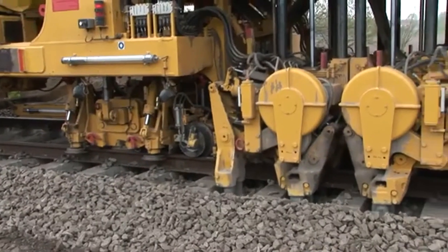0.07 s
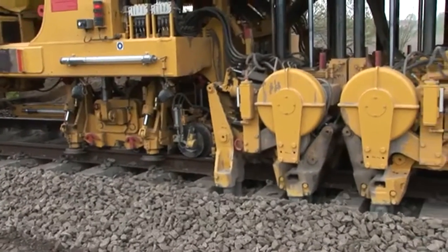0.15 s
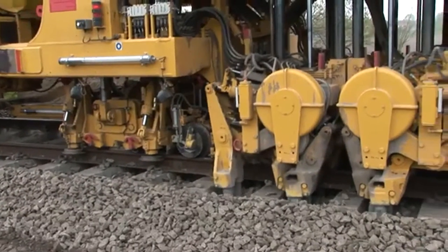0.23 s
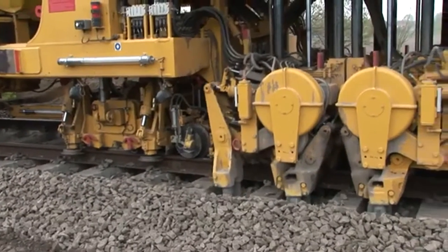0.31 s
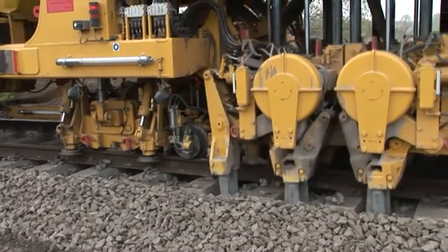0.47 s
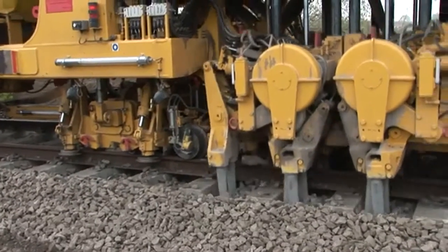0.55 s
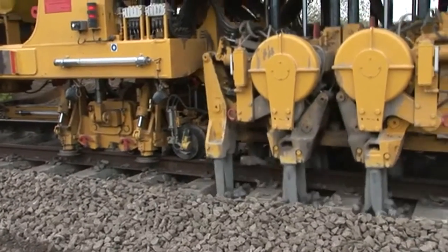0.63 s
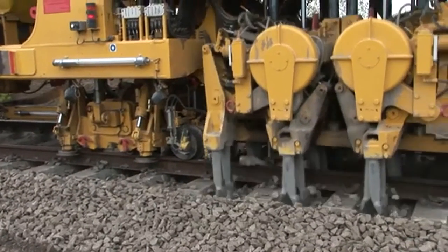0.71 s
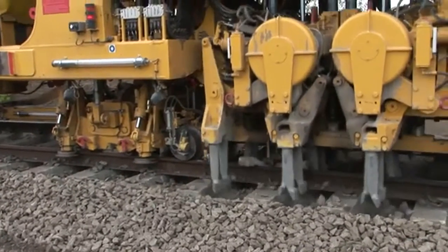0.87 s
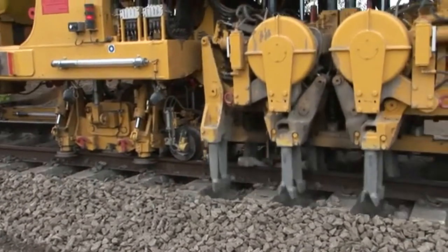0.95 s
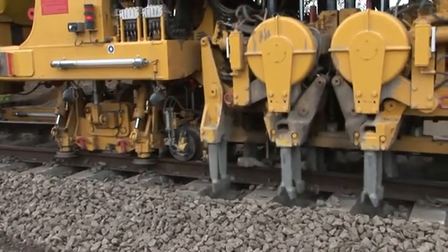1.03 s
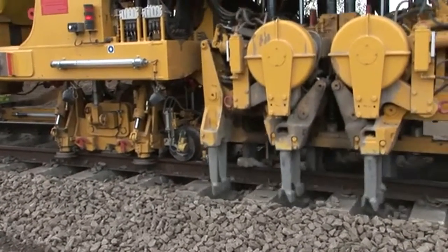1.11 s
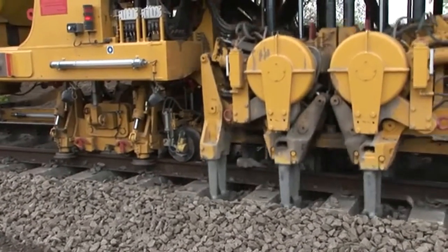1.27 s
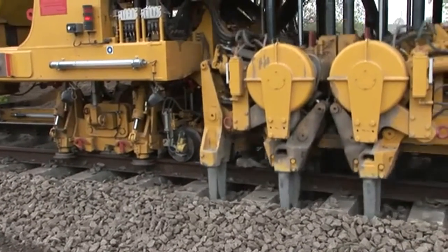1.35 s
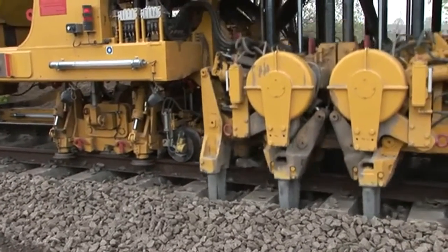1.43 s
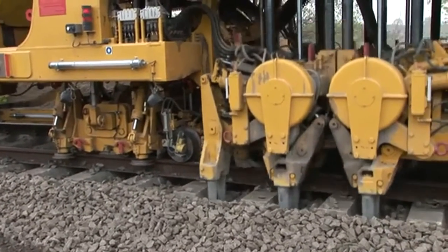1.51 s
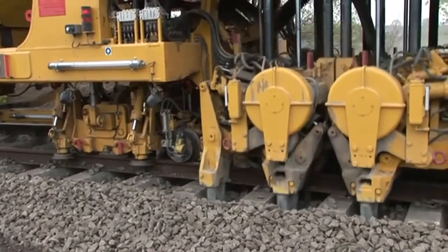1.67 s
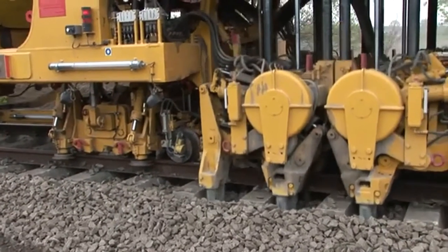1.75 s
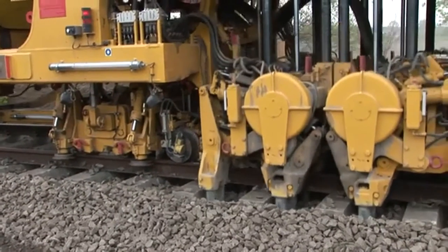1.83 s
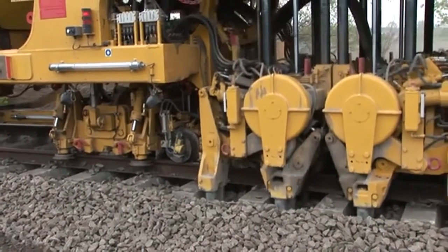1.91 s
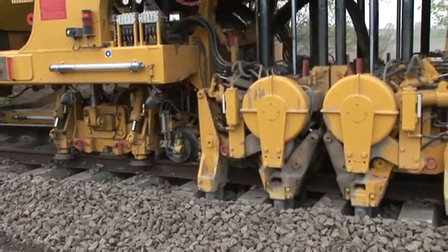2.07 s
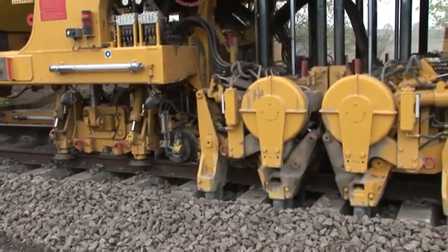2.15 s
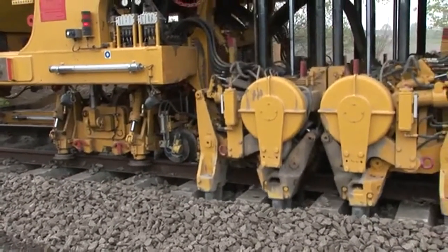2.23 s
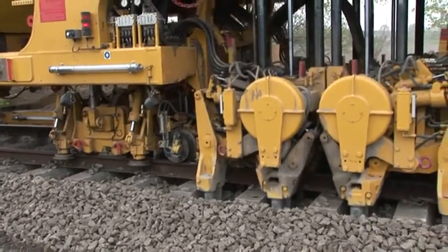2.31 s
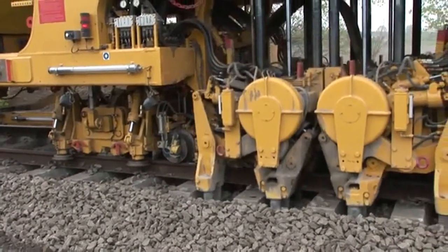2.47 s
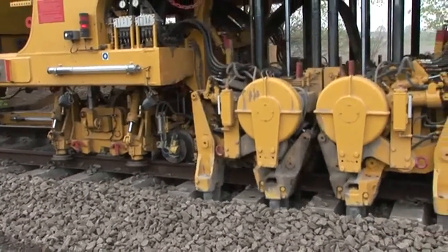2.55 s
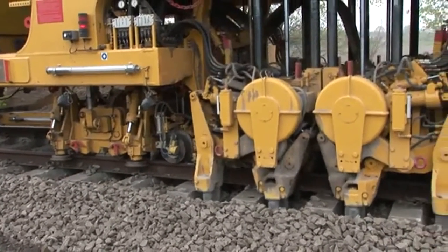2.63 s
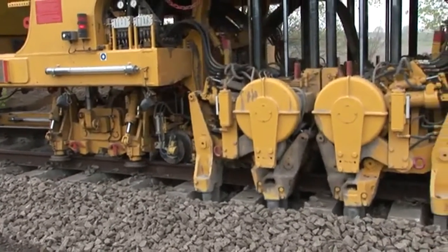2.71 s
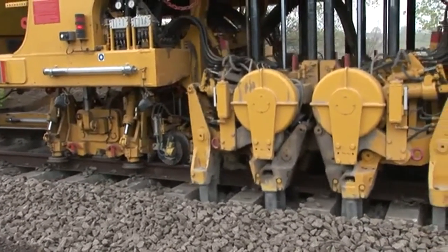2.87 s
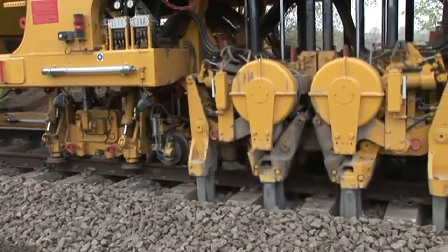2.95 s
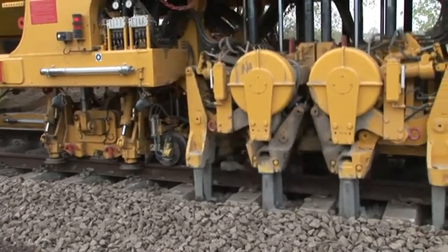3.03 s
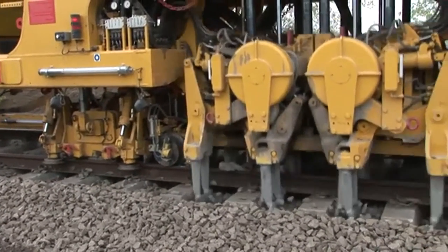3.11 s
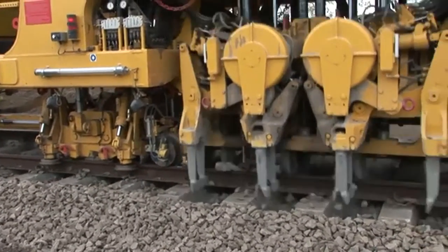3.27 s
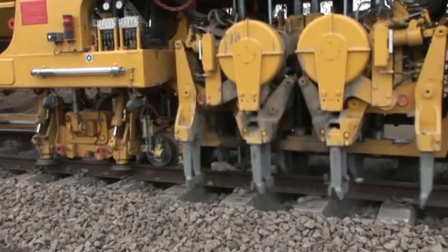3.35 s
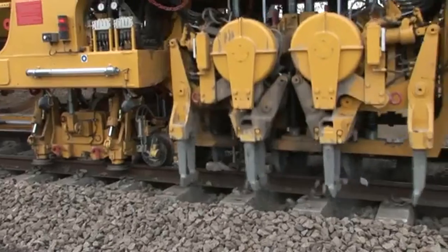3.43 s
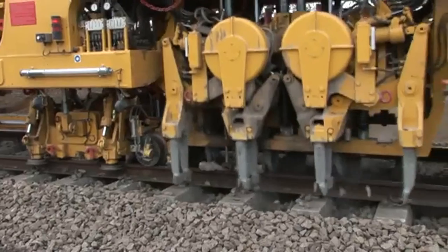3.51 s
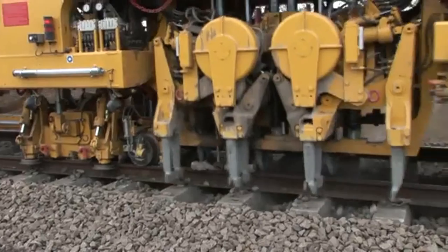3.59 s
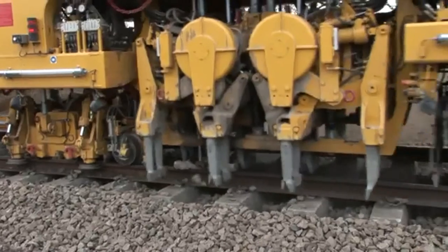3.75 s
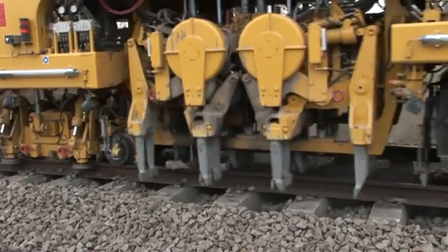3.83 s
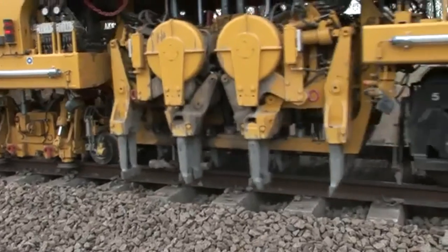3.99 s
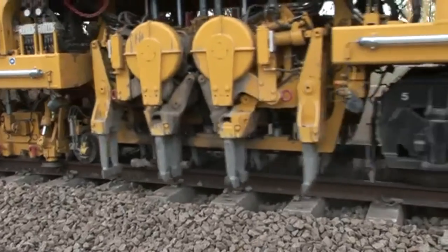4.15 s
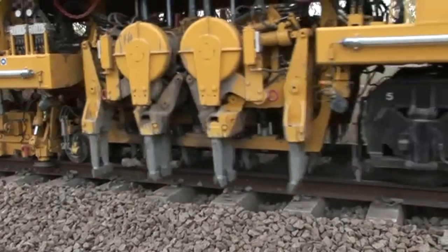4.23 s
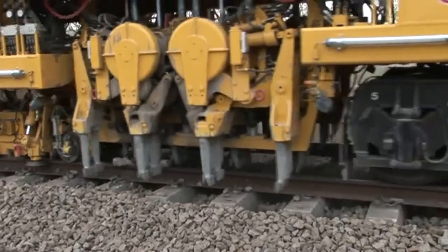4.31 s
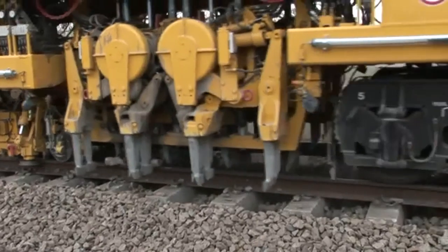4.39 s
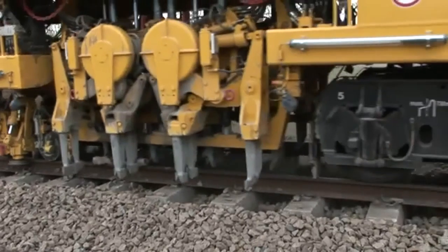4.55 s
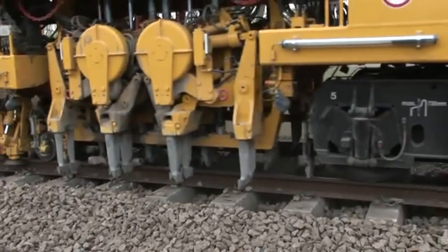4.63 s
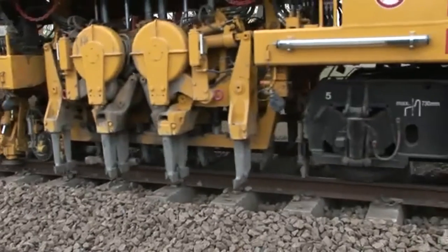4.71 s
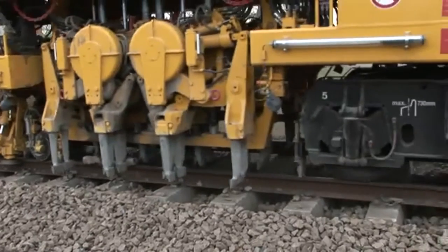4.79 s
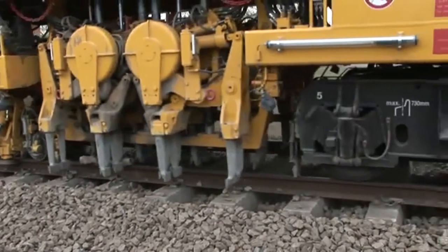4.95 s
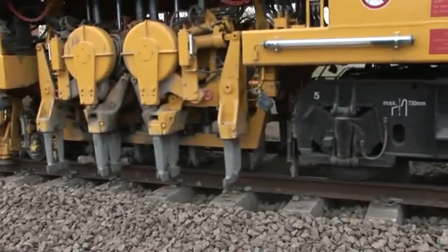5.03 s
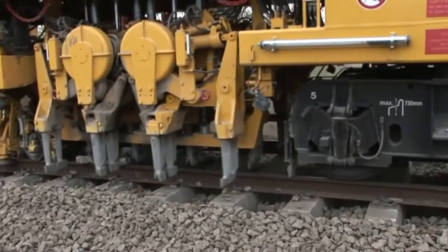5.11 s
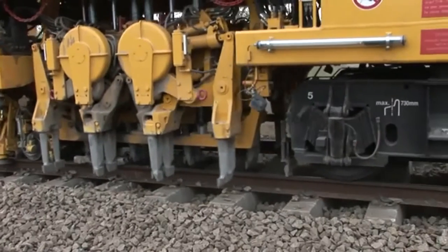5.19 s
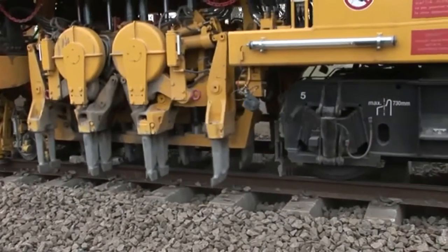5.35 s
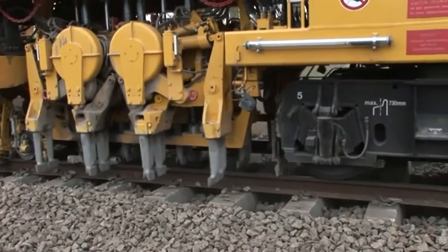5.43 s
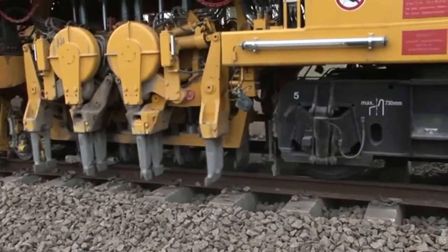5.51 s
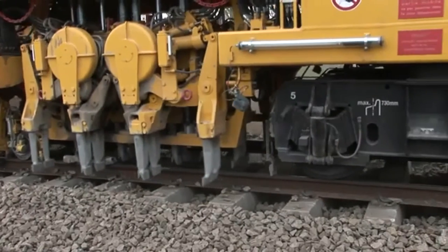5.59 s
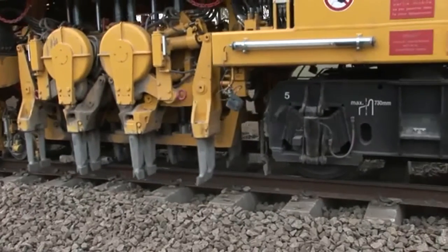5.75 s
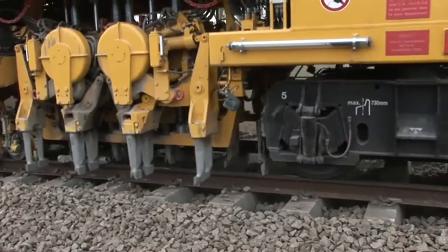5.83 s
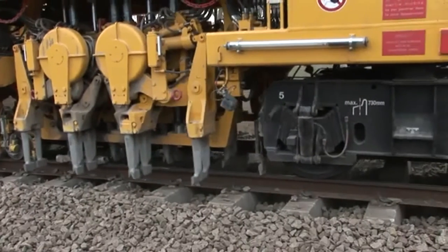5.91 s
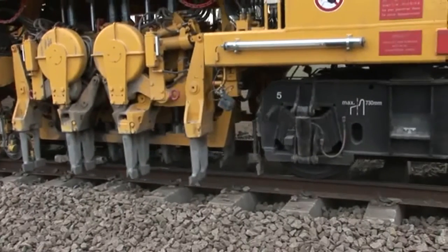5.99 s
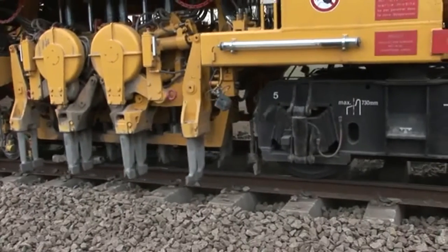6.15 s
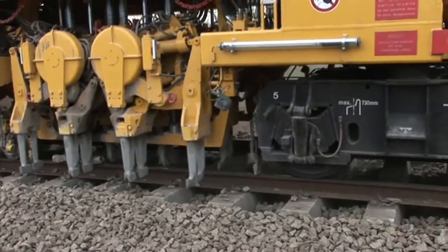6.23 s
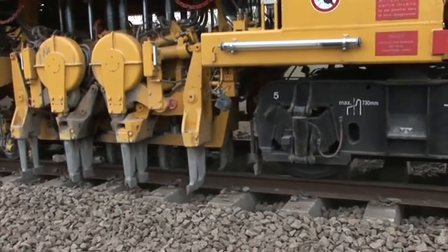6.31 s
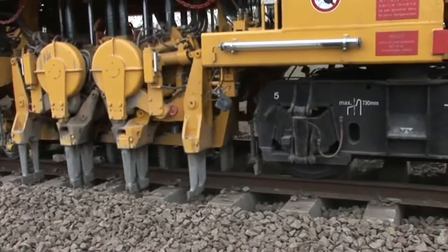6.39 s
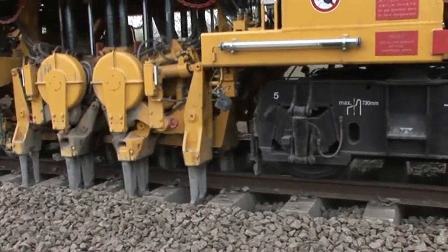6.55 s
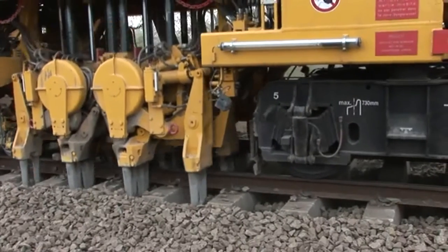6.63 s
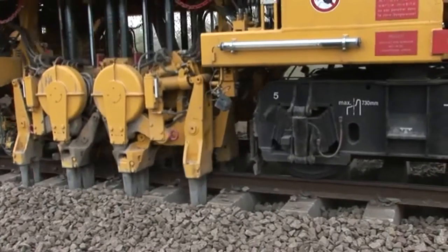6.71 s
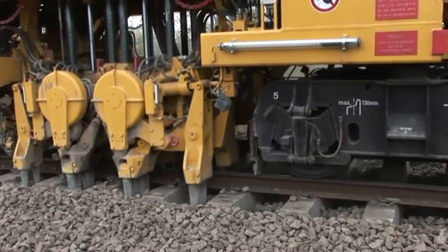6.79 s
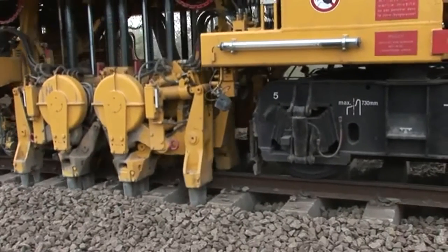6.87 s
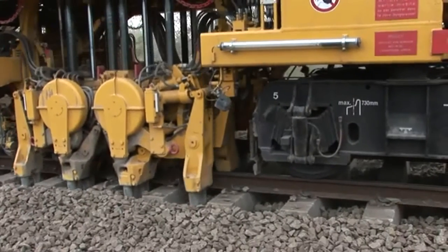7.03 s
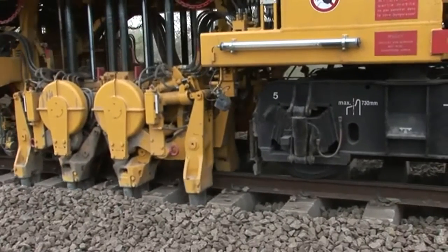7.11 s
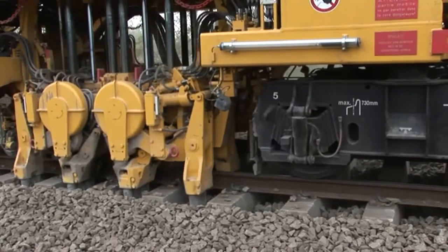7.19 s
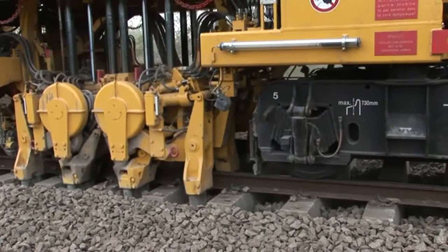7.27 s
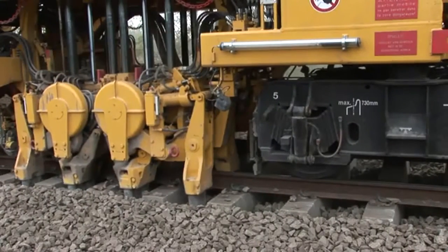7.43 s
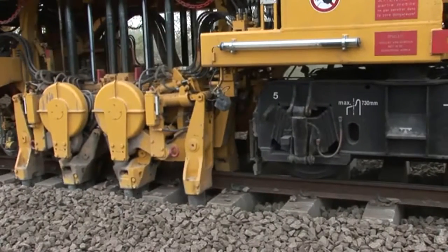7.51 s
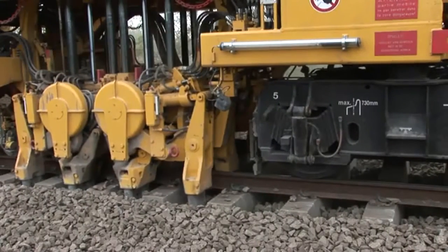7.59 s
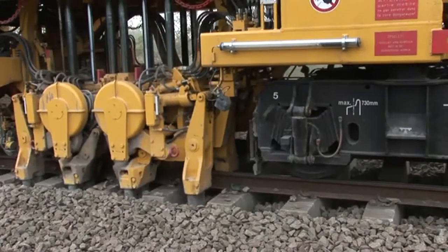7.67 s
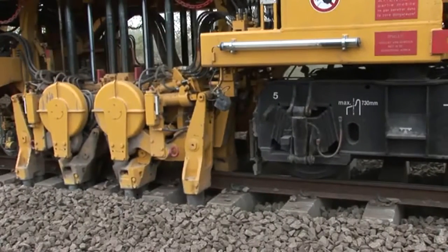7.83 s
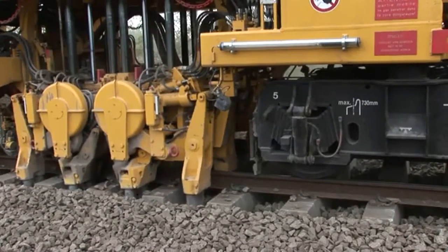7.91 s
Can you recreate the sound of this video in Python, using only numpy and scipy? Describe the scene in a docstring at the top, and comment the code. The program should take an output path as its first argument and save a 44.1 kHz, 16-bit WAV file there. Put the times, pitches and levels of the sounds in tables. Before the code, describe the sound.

A diesel engine, fan and hydraulic pump make a dense, steady roar beside the track. Over it, steel tines shaking dozens of times a second rattle harshly in ballast, with hard knocks and brief steel ringing. The stone noise stops and returns twice; between plunges comes a buzzing, pulsing mechanical drone with puffs of air. Close, dry, open-air stereo pickup.

```python
"""Track tamping machine in ballast

An eccentric shaft shakes steel tines about 36 times a second: loose joints buzz as a stack of shaft harmonics.
The tines start buried, lift, plunge again, lift, and plunge once more: stones click, crush and grind
as filtered bursts and noise in step with the shaft, with hard blows and singing steel on top.
Behind them are a diesel and fan on geared tones, a sliding pump hum, a throbbing roar, air hiss and low lurches.
"""
import sys
import numpy as np
from scipy import signal
from scipy.fft import rfft, irfft, next_fast_len
from scipy.io import wavfile
from scipy.ndimage import uniform_filter1d, map_coordinates

SR = 44100
rng = np.random.default_rng(int(sys.argv[2]) if len(sys.argv) > 2 else 0)


def store_wav(level_fs):
    """Save 16-bit WAV to argv[1]."""
    pcm = np.round(np.clip(np.atleast_2d(level_fs), -1, 1) * 32767)
    wavfile.write(sys.argv[1], SR, pcm.T.astype(np.int16))


N = 350595

# Speed of the eccentric shaft. Each row: time in seconds, turns per second.
SHAFT_SPEED = [(0, 35.9), (.4, 36.3), (1.1, 36.6), (1.6, 36), (2.15, 35), (2.6, 35.8), (3.35, 36.88),
               (3.75, 36.66), (4.15, 36.14), (4.65, 35.9), (5.15, 36.74), (5.5, 37.06), (5.92, 37.12),
               (6.35, 36.6), (6.9, 36.25), (7.3, 35.2), (7.95, 35.2)]
# Buzz of the free tines. Each row: multiple of the shaft rate, relative level in dB.
FREE_PARTIALS = [(3, -11), (4, -13), (5, -13), (6, -13), (7, -9), (8, -13), (9, -9), (10, -12), (11, -10),
                 (12, -12), (13, -9), (14, -15), (15, -10), (16, -12), (17, -16), (18, -19), (19, -15),
                 (20, -16), (21, -12.5), (22, -16), (23, -16), (24, -19), (25, -16), (26, -18), (27, -16),
                 (28, -13), (29, -17), (30, -15), (31, -17), (32, -17), (33, -13), (34, -19), (35, -15)]
# Thrum of the buried tines. Each row: multiple of the shaft rate, relative level in dB.
BURIED_PARTIALS = [(2, -7), (3, -5), (4, 0), (5, -11), (6, -6), (7, -6), (10, -4), (12, -1), (13, -3),
                   (14, -4), (16, -6), (22, -8)]
# Panels of the frame sing along with single partials.
# Each row: multiple of the shaft rate, start in seconds, end in seconds, boost in dB.
PANEL_SWELLS = [(6, 5.55, 6.15, 7), (7, 3.4, 3.85, 5), (7, 5.2, 5.52, 9.5), (7, 6.4, 6.65, 7.5),
                (8, 4.1, 4.5, 6), (9, .9, 1.35, 6), (9, 5, 6.25, 7.5), (10, 4.8, 5.4, 6),
                (10, 5.9, 6.65, 7.5), (11, 3.38, 4.05, 7.5), (11, 4.45, 5.05, 7), (11, 5.35, 6.35, 8),
                (12, 1, 1.3, 6), (12, 3.7, 4, 6), (12, 5.05, 5.5, 9), (14, 3.8, 4.3, 10),
                (15, 3.38, 3.68, 8), (15, 4.1, 4.75, 7.5), (15, 6.1, 6.7, 7), (16, 4.1, 4.45, 10),
                (17, 5.2, 6.1, 5.5), (19, 5.08, 6.28, 7), (19, 5.08, 5.42, 4.5), (19, 5.75, 6.25, 4),
                (23, 5.05, 6.5, 5), (27, 4.65, 6.7, 9.5), (27, 4.97, 5.42, 6), (30, 5.1, 5.3, 7),
                (35, 3.75, 4.25, 7), (35, 5.8, 6.08, 10)]
# Distance and balance. Each row: time in seconds, buzz gain in dB, left minus right of the whole mix in dB.
PASSING = [(0, -1.5, -0.8), (2.8, -1.5, -1), (3.6, 1, 0), (4.7, 1, -0.5), (5.4, 2, -0.2), (7.95, 1.5, 0.6)]

# Tines going into the ballast. Each row: start of sinking in seconds, sinking time in seconds,
# start of lifting in seconds, lifting time in seconds, then base levels of clatter, grinding and thrum in dB.
PLUNGES = [(-.3, .15, 0.72, .22, -21, -22, -31), (1.45, 0.16, 3.053, .38, -19.5, -23.5, -31.5),
           (6.652, 0.08, 8.4, .3, -19, -26.5, -33)]
# The tines close and pack the stones. Each row: start in seconds, end in seconds, extra grinding in dB.
SQUEEZES = [(.4, .76, 4), (1.84, 2.28, 2.5), (6.72, 7.56, 5.5)]
# Packed stones give way. Each row: start in seconds, end in seconds, extra clatter in dB.
CRUNCHES = [(.15, .19, 2), (.25, .37, 3), (.455, .495, 1.5), (.64, .715, 3), (1.78, 1.87, 1.5),
            (2.12, 2.2, 1.5), (2.7, 2.82, 1.5), (2.92, 3.0, 1.5), (3.06, 3.15, 2), (6.81, 6.9, 2),
            (6.98, 7.07, 2), (7.43, 7.53, 1.5)]
# Hard blows on a stone or steel stop. Each row: time in seconds, relative level in dB, ring pitch in Hz.
STRIKES = [(.0952, -8, 2500), (.1236, -9, 2500), (0.251, -6, 2580), (0.3132, -5, 2690), (0.478, -8, 2380),
           (.5846, -9, 2400), (0.6656, -2, 3110), (1.7957, -9, 2400), (1.8176, -8, 2600), (2.048, -7, 620),
           (2.5105, -8, 2400), (2.7086, -9, 2500), (2.7374, -4, 2265), (2.972, -9, 2700),
           (6.6542, -12, 3300), (6.6821, -10, 3000), (6.7426, -8, 2570), (6.7764, -8, 2070),
           (6.8243, -4, 2870), (6.8814, -7, 2090), (6.9929, -4, 2350), (7.3945, -11, 2300)]
# Steel shaken or rubbed into ringing. Each row: start in seconds, end in seconds, first pitch in Hz,
# last pitch in Hz, level in dB, fuzz in radians of phase.
STEEL_RINGS = [(.15, .56, 146.5, 145, -24, .2), (.42, .68, 870, 835, -31, 1.2),
               (.45, .7, 1230, 1236, -33, .8), (.75, 1.05, 1162, 1162, -41, .3),
               (1.72, 2.3, 1338, 1320, -30, .8), (2.15, 2.32, 735, 745, -33, .6),
               (2.55, 3.1, 214, 219, -30, .25), (3.05, 3.4, 841, 841, -38, .4),
               (3.15, 3.45, 1161, 1163, -35, .3), (6.85, 7.45, 975, 972, -35, .7),
               (7.22, 7.65, 574, 564, -28.5, .5), (7.15, 7.6, 1310, 1330, -31.5, 1.1)]

# Diesel speed. Each row: time in seconds, firing rate in Hz.
FIRING_RATE = [(0, 68.6), (.6, 68.9), (1.1, 66.9), (3.1, 69.4), (3.6, 67.7), (4.3, 67), (4.7, 68.7),
               (5.8, 69.4), (6.3, 68.1), (7.95, 68)]
# Hydraulic pump pitch. Each row: time in seconds, pitch in Hz.
PUMP_PITCH = [(0, 174), (.85, 165), (2, 184), (2.2, 177), (2.45, 177), (3.45, 167), (4.27, 182), (4.8, 176),
              (5.7, 157), (6.7, 164), (7.1, 177), (7.95, 178)]
# The pump comes under load. Each row: start in seconds, end in seconds, boost in dB.
PUMP_SURGES = [(1.42, 2.14, 6), (2.32, 2.49, 8), (3.65, 4.45, 3), (3.97, 4.39, 5.5), (4.66, 4.88, 7),
               (4.88, 5.3, 2.5), (7.1, 7.85, 3)]
# Air valve blasts. Each row: peak in seconds, rise in seconds, fall in seconds, hiss level in dB, roar level in dB.
VALVE_BLASTS = [(.82, .07, 0.073, -41, -40), (3.3, .032, 0.046, -35, -40), (3.87, 0.039, .11, -36, -30),
                (4.59, .055, .06, -37.5, -26), (4.68, 0.08, 0.075, -35.5, -23.5),
                (4.675, .018, .02, -50, -18.5), (5.07, .015, .03, -41, -42), (6.48, 0.028, 0.043, -35, -24)]
# The heavy frame lurches. Each row: start in seconds, end in seconds, rumble level in dB.
LURCHES = [(1.88, 2.02, -30), (4.224, 4.43, -26.5), (7.65, 7.854, -24)]

# Colour of the steady machine roar. Each row: frequency in Hz, relative level in dB per Hz.
MACHINERY_SPECTRUM = [(25, -17.5), (60, -11.5), (95, -7), (170, -6), (300, -8.5), (500, -10), (900, -11.3),
                      (1800, -10.8), (3100, -12.8), (4050, -19), (4650, -30.5), (6000, -27.5),
                      (9800, -33.3), (15000, -35.7)]
# Colour of clattering stones and of cracks. Each row: frequency in Hz, relative level in dB per Hz.
CLATTER_SPECTRUM = [(500, -17), (1200, -3), (1800, -3), (2350, 2), (3000, -2), (3900, -1), (4500, -8),
                    (5050, -3.5), (5450, -9), (6000, -5), (7200, -4.5), (8500, -16.5), (10000, -23),
                    (15000, -30)]
# Colour of stones grinding together. Each row: frequency in Hz, relative level in dB per Hz.
GRINDING_SPECTRUM = [(40, -27), (75, -23), (110, -1.5), (280, -4.5), (460, -1.5), (660, -3.5), (850, -1),
                     (1300, -6.5), (2000, -5.5), (5000, -46)]
# Colour of thin escaping air. Each row: frequency in Hz, relative level in dB per Hz.
HISS_SPECTRUM = [(2000, -27), (5000, -9), (7200, 4), (8300, 7), (9500, 2), (11500, 4.5), (15500, 4.5)]
# Colour of the roaring vent. Each row: frequency in Hz, relative level in dB per Hz.
ROAR_SPECTRUM = [(300, -18), (800, 1), (1200, 0), (1500, -7), (1900, 2.5), (2250, 5), (2600, -5),
                 (3200, -5.5), (4500, -14), (5000, -5), (5500, -9), (8000, -19), (15000, -37)]
# Colour of the frame's rumble. Each row: frequency in Hz, relative level in dB per Hz.
RUMBLE_SPECTRUM = [(25, -12), (60, -1), (110, 0), (240, 1), (400, -25), (1500, -70)]
# Stereo width at the microphone pair. Each row: frequency in Hz, difference over sum in dB.
STEREO_WIDTH = [(60, -57), (200, -16), (500, -9), (1200, -5.5), (2200, -13.5), (3150, -29), (4150, -1),
                (5050, -6.5), (5500, 5), (6000, 9.5), (7200, 24.5), (8300, 0.5), (9100, 5.5), (10700, -8.5),
                (14000, 0.5)]
# Treble dip of the microphones. One row: centre in Hz, width in Hz, depth in dB.
TREBLE_DIP = (7250, 500, -16)
TOP_HZ = 15750  # nothing passes above this

BUZZ_DB, BUZZ_DB_PER_TURN = -29.5, 1  # base level; dB for each extra turn per second
BUZZ_BURIED_DB = -6.5  # damping by the stones
SWELL_EDGE_S, SURGE_EDGE_S, SQUEEZE_EDGE_S, CRUNCH_EDGE_S = 0.11, 0.08, 0.072, 0.039
DIESEL_DB, FAN_DB, PUMP_DB = -29, -33.5, -27.5  # base levels
BOOM_BURIED_DB, DRONE_BURIED_DB = -1, -9  # change of the two low diesel notes with buried tines
FAN_PER_FIRING = 3.8  # blade passes for each firing
BITE_DB, BITE_S = 1.5, 0.4  # extra clatter until this long after sinking starts
PULL_DB, PULL_S = 0.5, 0.88  # extra clatter from this long before lifting starts
CLATTER_EDGE_S, CLATTER_WAVER_DB = 0.15, 0.17
TOUCH_SHARE = 0.35  # share of the clatter that starts at once on contact
# Contacts per second on average, spread of sizes in dB, 60 dB decay in seconds of a 3 kHz click
STONE_RATE, STONE_SIZE_DB, STONE_T60 = 1400, 1.3, 0.035
KNOCK_RATE, KNOCK_SIZE_DB, KNOCK_T60 = 480, 1.2, 0.025
KNOCK_DB, CRUSH_DB = -4, 3  # big stones and crushing noise against the small clicks
CLUMP_DB = 1.5  # big stones shift in bunches
PULSING_DB = 0.7  # swing of the stone contact force over a turn
STRIKE_SPREAD = 0.07  # how far the modes of one blow lie apart, in log frequency


def amp(db):
    """Decibels to gain."""
    return 10 ** (np.asarray(db) / 20)


def unit(x):
    """Scale to rms 1."""
    return x / np.sqrt(np.mean(x ** 2) + 1e-20)


def along(points, hz):
    """Read (Hz, value) points on a log frequency axis."""
    point_hz, value = np.transpose(points)
    return np.interp(np.log(hz + 1), np.log(point_hz + 1), value)


def curves(rows):
    """Draw one automation curve for each column after the time."""
    s, *columns = np.transpose(rows)
    return [np.interp(np.arange(N) / SR, s, column) for column in columns]


def wobble(rate):
    """A smooth random curve with this many knots a second."""
    knots = rng.standard_normal(int(N * rate / SR) + 4)
    coarse = np.arange(0, N + 64, 64)
    return np.interp(np.arange(N), coarse, map_coordinates(knots, [coarse * rate / SR]))


def gate(start, end, edge):
    """Open between two times, with soft edges."""
    t = np.arange(N) / SR
    return np.clip(np.minimum(t - start, end - t) / edge + .5, 0, 1)


def boosts(rows, edge):
    """Sum of (start, end, dB) boosts with soft edges, in dB."""
    return sum(db * gate(start, end, edge) for start, end, db in rows)


def cycles(hz):
    """Running phase of a changing frequency."""
    return 2 * np.pi * np.cumsum(hz) / SR


def filtered(x, response):
    """Shape x with a response of frequency."""
    m = next_fast_len(N + 8192)
    return irfft(rfft(x, m) * response(np.fft.rfftfreq(m, 1 / SR)), m)[..., :N]


def bump(hz, centre, width):
    """A resonance shape, 1 at its centre."""
    return 1 / (1 + (2 * (hz - centre) / width) ** 2)


def noise():
    """Two unrelated white noises."""
    return rng.standard_normal((2, N))


def spread(pair, spectrum):
    """Turn two signals into a coloured left and right, their mean at rms 1."""
    def response(hz):
        turn = np.arctan(amp(along(STEREO_WIDTH, hz)))
        return amp(along(spectrum, hz)) * [np.cos(turn), np.sin(turn)]
    mid, side = filtered(pair, response)
    return np.array([mid + side, mid - side]) / np.std(mid)


def patchy(pair, depth_db):
    """Shifting paths and contacts give the sound patches of changing colour."""
    z = signal.stft(pair, nperseg=1024)[2]
    grain = rng.standard_normal(z.shape[1:])
    across_frequency = uniform_filter1d(grain, size=4, axis=0)
    field = uniform_filter1d(across_frequency, size=9, axis=1)
    return signal.istft(z * amp(depth_db * unit(field)), nperseg=1024)[1][:, :N]


def shaken(shaft, depth_db, scatter_db):
    """Shaft-driven force with several peaks a turn, never twice alike; a negative depth inverts the swing."""
    turn = shaft + 0.16 * wobble(12)
    push = np.cos(turn) + .8 * np.cos(2 * turn) + .7 * np.cos(3 * turn + 2) + .7 * np.cos(4 * turn + 1)
    return unit(amp(depth_db * push + scatter_db * wobble(70)))


def harmonics(shaft, orders, waver_db, jitter):
    """Wavering partials on multiples of the shaft rate, with panel swells; a steady 0 dB partial is rms 1."""
    out = np.zeros((2, N))
    first_speed = np.transpose(SHAFT_SPEED)[1][0]
    for k, db in orders:
        swell_db = boosts([row[1:] for row in PANEL_SWELLS if row[0] == k], SWELL_EDGE_S)
        gain = amp(db + swell_db + waver_db * wobble(6))
        phase = k * shaft + rng.uniform(0, 2 * np.pi) + jitter * wobble(9)
        # each partial reaches the two microphones with its own phase offset
        apart = np.arctan(amp(along(STEREO_WIDTH, k * first_speed))) * rng.choice([-1, 1])
        out += gain * np.sin([phase + apart, phase - apart])
    return np.sqrt(2) * out


def contacts(force, per_second, size_db, t60, low_hz, high_hz):
    """Stones click against each other, each at its own pitch, more often when the force is high."""
    start = np.flatnonzero(rng.random(N) < force ** 2 * per_second / SR)
    u = rng.random((len(start), 5))
    hz = low_hz * (high_hz / low_hz) ** u[:, :1]
    size = amp(size_db * np.minimum(-np.log(u[:, 1:2]), 4)) * np.sqrt(hz)
    t = np.arange(round(.5 * t60 * SR)) / SR
    life = t60 * (3000 / hz) ** 0.27  # small stones ring higher and shorter
    clicks = size * amp(-60 * t / life) * np.sin(2 * np.pi * hz * t)
    where = (start[:, None] + np.arange(len(t))).ravel()

    def summed(weight):
        return unit(np.bincount(where, (clicks * weight).ravel(), N + len(t))[:N])

    polarity = np.sign(u[:, 2:3] - .5)
    side_weight = u[:, 3:4] - .5
    return np.array([summed(polarity), summed(side_weight)])


def machinery(shaft):
    """Fans, oil flow and rattling linkage make a steady noise roar that throbs with the shaft."""
    throb = shaken(shaft, depth_db=-0.84, scatter_db=0.5)
    roar = spread(patchy(noise() * throb, depth_db=1.96), MACHINERY_SPECTRUM)
    return amp(-21.0 + 0.043 * wobble(2.1)) * roar


def diesel(buried):
    """The exhaust drones on the firing rate, its double and a faint eighth; the low two dip with buried tines."""
    firing = cycles(curves(FIRING_RATE)[0]) + 0.06 * wobble(12)
    boom = amp(-11.0 + BOOM_BURIED_DB * buried + 4.5 * wobble(6.3)) * np.sin(firing)
    drone = amp(-2.0 + DRONE_BURIED_DB * buried + 1.36 * wobble(3.02)) * np.sin(2 * firing)
    whine = amp(-11 + 3 * wobble(3)) * np.sin(8 * firing)
    return np.sqrt(2) * amp(DIESEL_DB) * (boom + drone + whine)


def fan():
    """The blade tone of the cooling fan is geared to the engine."""
    blades = cycles(FAN_PER_FIRING * curves(FIRING_RATE)[0]) + 0.2 * wobble(12)
    return np.sqrt(2) * amp(FAN_DB + 1.2 * wobble(7.6)) * np.sin(blades)


def pump():
    """The hydraulic hum slides in pitch and swells under load, and pressure ripple roughens it."""
    stroke = cycles(curves(PUMP_PITCH)[0]) + 0.22 * wobble(22)
    hum = np.sin(stroke) + amp(-14.0) * np.sin(2 * stroke) + amp(-14.5) * np.sin(3 * stroke)
    level_db = PUMP_DB + boosts(PUMP_SURGES, SURGE_EDGE_S)
    return amp(level_db + 1.1 * wobble(25)) * hum


def valves():
    """Short blasts of air swell and fade: a thin hiss over the roar of the vent."""
    t = np.arange(N) / SR
    hiss_gain, roar_gain = np.zeros((2, N))
    for s, rise, fall, hiss_db, roar_db in VALVE_BLASTS:
        opening = np.exp(-((t - s) / np.where(t < s, rise, fall)) ** 2)
        hiss_gain += amp(hiss_db) * opening
        roar_gain += amp(roar_db) * opening
    flutter = amp(3.0 * wobble(45))
    hiss = hiss_gain * spread(patchy(noise(), depth_db=-3.5), HISS_SPECTRUM)
    roar = roar_gain * spread(noise(), ROAR_SPECTRUM)
    return flutter * (hiss + roar)


def lurches():
    """A short, deep noise rumble when the heavy frame jolts."""
    gain = sum(amp(db) * gate(start, end, edge=0.1) for start, end, db in LURCHES)
    return gain * spread(noise(), RUMBLE_SPECTRUM)


def ringing_steel():
    """Shaken steel sings briefly and drifts in pitch; the fuzzier the note, the more it breaks up."""
    out = np.zeros((2, N))
    for start, end, first_hz, last_hz, db, fuzz in STEEL_RINGS:
        hz, = curves([(start, first_hz), (end, last_hz)])
        phase = cycles(hz) + fuzz * wobble(40)
        note = unit(amp(3.5 * fuzz * wobble(30)) * np.sin([phase, phase + 0.18]))
        out += amp(db) * gate(start, end, edge=0.054) * note
    return out


def strikes():
    """A stone or a steel stop takes a full blow: a noise crack and a short, clashing ring of close modes."""
    t = np.arange(SR // 5) / SR
    blows = np.zeros((2, N + SR))
    cracks = spread(noise(), CLATTER_SPECTRUM)
    for s, db, ring_hz in STRIKES:
        first = round(s * SR)
        hz = ring_hz * np.exp(STRIKE_SPREAD * rng.standard_normal((6, 1)))
        ring = unit(np.sin(2 * np.pi * hz * t + rng.uniform(0, 2 * np.pi, hz.shape)).sum(axis=0))
        crack = cracks[:, first:][:, :len(t)]
        blow = 0.16 * ring * amp(-60 * t / 0.19) + 0.15 * crack * amp(-60 * t / 0.16)
        attack = 1 - np.exp(-t / 0.00067)
        blows[:, first:][:, :len(t)] += amp(db) * blow * attack
    return blows[:, :N]


def depth(s_in, sinking, s_out, lifting):
    """How deep the tines are during one plunge, 0 to 1: sink, hold, lift."""
    t = np.arange(N) / SR
    return np.clip(np.minimum((t - s_in) / sinking, 1 - (t - s_out) / lifting), 0, 1)


def plunging():
    """Depth of the tines, and the gains of clatter, grinding and thrum that follow from it."""
    buried, clatter, grind, thrum = np.zeros((4, N))
    for s_in, sinking, s_out, lifting, clatter_db, grind_db, thrum_db in PLUNGES:
        deep = depth(s_in, sinking, s_out, lifting)
        bite = (s_in - sinking, s_in + BITE_S, BITE_DB)
        pull = (s_out - PULL_S, s_out + lifting, PULL_DB)
        moving_db = boosts([bite, pull], CLATTER_EDGE_S)
        touching = gate(s_in, s_out, edge=.005)
        buried += deep
        clatter += np.maximum(deep, TOUCH_SHARE * touching) * amp(clatter_db + moving_db)
        grind += deep ** 2 * amp(grind_db)
        thrum += deep ** 2 * amp(thrum_db)
    crunch_db = boosts(CRUNCHES, CRUNCH_EDGE_S) + CLATTER_WAVER_DB * wobble(10)
    squeeze_db = boosts(SQUEEZES, SQUEEZE_EDGE_S)
    return buried, clatter * amp(crunch_db), grind * amp(squeeze_db), thrum


def tamping_unit(shaft, buried, thrum_gain):
    """Loose joints knock with the shaft: a buzz that grows with speed and is damped by stones, plus a low thrum."""
    speed, = curves(SHAFT_SPEED)
    near_db, _ = curves(PASSING)
    speed_db = BUZZ_DB_PER_TURN * (speed - speed.mean())
    level_db = BUZZ_DB + near_db + speed_db + BUZZ_BURIED_DB * buried
    # twelve upper partials, falling 12 dB an octave with a little scatter
    count = len(FREE_PARTIALS)
    overtones = [(k, -16 - 12 * np.log2(k / count) + rng.normal(0, 0.97))
                 for k in range(count + 1, count + 13)]
    buzz = harmonics(shaft, list(FREE_PARTIALS) + overtones, waver_db=1.7, jitter=0.25)
    thrum = harmonics(shaft, BURIED_PARTIALS, waver_db=2.0, jitter=0.96)
    return amp(level_db) * buzz + thrum_gain * thrum


def ballast(shaft, clatter_gain, grind_gain):
    """Tines drive into stones: gritty clicks and heavier knocks in a crushing hiss, a duller grinding below."""
    force = shaken(shaft, depth_db=PULSING_DB, scatter_db=0.5)
    clumps = unit(force * amp(CLUMP_DB * wobble(14)))
    clicks = contacts(force, STONE_RATE, STONE_SIZE_DB, STONE_T60, low_hz=900, high_hz=14400)
    knocks = contacts(clumps, KNOCK_RATE, KNOCK_SIZE_DB, KNOCK_T60, low_hz=700, high_hz=3400)
    crush = unit(noise() * force)
    stones = clicks + amp(KNOCK_DB) * knocks + amp(CRUSH_DB) * crush
    clatter = spread(patchy(stones, depth_db=1.1), CLATTER_SPECTRUM)
    rubbing = noise() * shaken(shaft, depth_db=0.5, scatter_db=2.5)
    grind = spread(patchy(rubbing, depth_db=2.5), GRINDING_SPECTRUM)
    return clatter_gain * clatter + grind_gain * grind


def scene():
    """One shaft drives the buzz, the throb and the clatter; the depth of the tines sets their shares."""
    shaft = cycles(curves(SHAFT_SPEED)[0])
    buried, clatter, grind, thrum = plunging()
    drive = diesel(buried) + fan() + pump() + machinery(shaft) + valves() + lurches()
    work = tamping_unit(shaft, buried, thrum) + ballast(shaft, clatter, grind) + strikes() + ringing_steel()
    _, pan_db = curves(PASSING)
    return (drive + work) * amp([pan_db / 2, -pan_db / 2])


def record(dry):
    """Microphone chain: round off the highest peaks, dip the treble and cut all above the band limit."""
    rounded = dry / (1 + np.abs(dry) ** 8) ** (1 / 8)
    centre, width, depth_db = TREBLE_DIP
    return filtered(rounded, lambda hz: amp(depth_db * bump(hz, centre, width)) * (hz < TOP_HZ))


dry = scene()
out = record(dry)
store_wav(out)
```